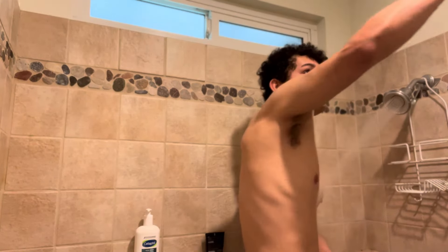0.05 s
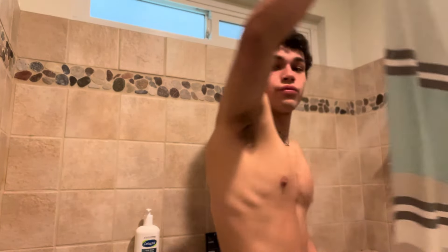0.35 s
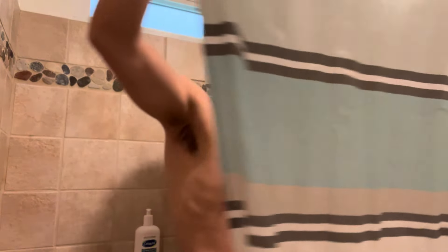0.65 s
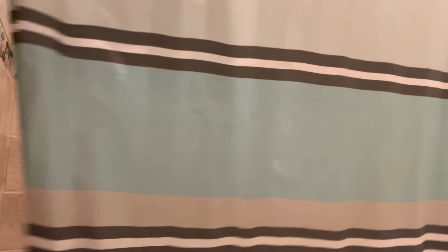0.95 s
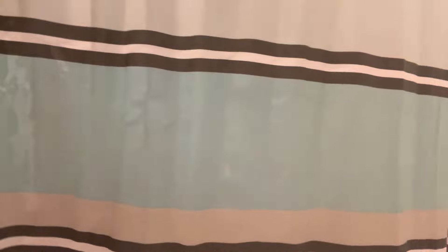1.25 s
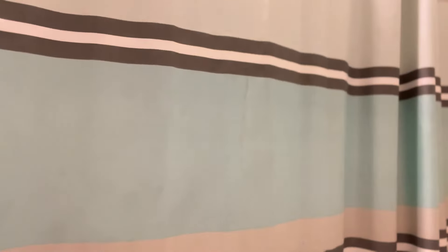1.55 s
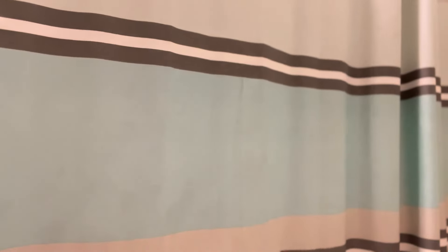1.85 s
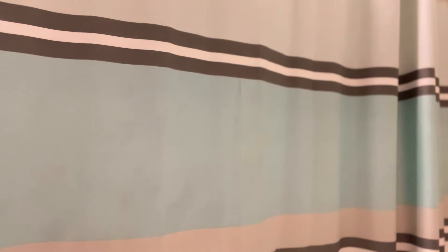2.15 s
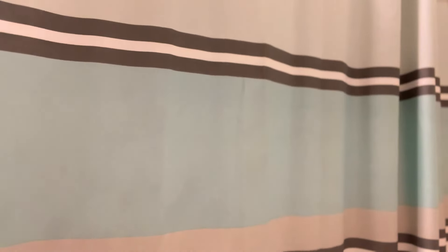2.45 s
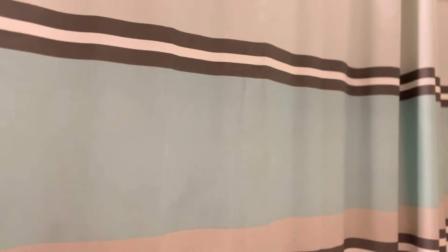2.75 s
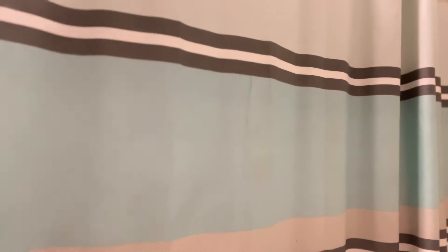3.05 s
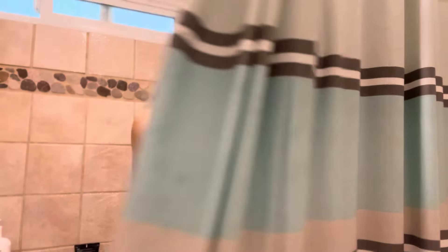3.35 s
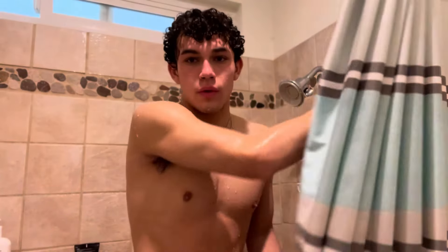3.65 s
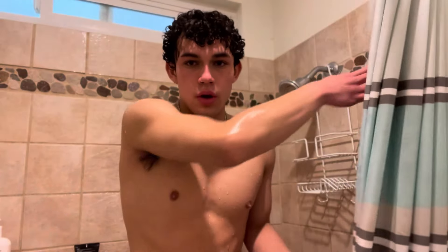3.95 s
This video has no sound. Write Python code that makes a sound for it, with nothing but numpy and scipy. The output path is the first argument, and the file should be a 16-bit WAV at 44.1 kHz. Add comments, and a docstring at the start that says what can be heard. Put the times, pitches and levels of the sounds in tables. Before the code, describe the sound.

Running shower water cuts off; after a hollow thump, curtain rings scrape along a rod.

```python
"""A shower hisses and drums in a tub in a small tiled bathroom; the curtain is drawn shut and slaps home. The
water sound breaks off abruptly at 1.3 s. Faint rustles and ticks follow, then a heavy thump sets the hollow tub
booming. The curtain is pulled open in jerks, its metal rings scraping along the rod and jingling as they
collide. Cloth and feet rumble and swish, over quiet room noise and a low hum."""
import sys
import numpy as np
from scipy import signal
from scipy.fft import rfft, irfft, next_fast_len
from scipy.io import wavfile
from scipy.ndimage import uniform_filter1d, map_coordinates

SR = 44100
rng = np.random.default_rng(int(sys.argv[2]) if len(sys.argv) > 2 else 0)


def output_pcm(signal):
    """Save a mono or channel-first signal as 16-bit PCM at the path in sys.argv[1].

    Samples are clipped to [-1, 1] before scaling.
    """
    pcm = np.clip(np.atleast_2d(signal).T, -1, 1) * 32767
    wavfile.write(sys.argv[1], SR, np.round(pcm).astype(np.int16))


N = 176400
SCENE_S = np.arange(N) / SR
EVENT_N = SR // 2
EVENT_S = np.arange(EVENT_N) / SR


def amp(db):
    """Decibels to gain."""
    return 10 ** (np.asarray(db) / 20)


def unit(x):
    """Scale to rms 1."""
    return x / np.sqrt(np.mean(x ** 2) + 1e-20)


def along(points, hz):
    """Interpolate (Hz, value) points on a log axis."""
    knots_hz, values = np.transpose(points)
    return np.interp(np.log(hz + 1), np.log(knots_hz + 1), values)


def curves(rows):
    """One value per sample for each column after the time."""
    times_s, *columns = np.transpose(rows)
    return [np.interp(SCENE_S, times_s, column) for column in columns]


def noise(size):
    """Two independent white noises."""
    return rng.standard_normal((2, size))


def wobble(knots_per_s):
    """Smooth random curve."""
    knots = rng.standard_normal(int(N * knots_per_s / SR) + 4)
    return map_coordinates(knots, [SCENE_S * knots_per_s])


def filtered(x, response):
    """Apply response(hz) to the spectrum of x."""
    n = x.shape[-1]
    padded = next_fast_len(n + SR // 8, True)
    return irfft(rfft(x, padded) * response(np.fft.rfftfreq(padded, 1 / SR)), padded)[..., :n]


def stereo(pair, spectrum=((1000, 0),)):
    """Two independent signals to a coloured left and right, room-wide, mid at rms 1."""
    # Room width. Each row: frequency in Hz, side over mid in dB.
    width = [(60, -14), (150, -11.5), (250, -8), (400, -4), (600, 3), (2400, -1), (4400, 2), (6500, -2.5),
             (8200, -9), (11000, -3.5), (15000, -3.5)]
    spread = lambda hz: np.array([np.ones_like(hz), amp(along(width, hz))])
    mid, side = filtered(pair, lambda hz: amp(along(spectrum, hz)) * spread(hz))
    return np.array([mid + side, mid - side]) / np.std(mid)


def patter(per_s, scatter_db=0, size=EVENT_N):
    """Two random trains of tiny impacts."""
    hit = rng.random((2, size)) < per_s / SR
    return hit * np.sign(noise(size)) * amp(scatter_db * noise(size))


def patchy(x, depth_db):
    """Brief random patches of brighter and duller pitch, as when drops land on different spots."""
    bins = signal.stft(x, nperseg=1024)[2]
    field = uniform_filter1d(rng.standard_normal(bins.shape[1:]), size=5, axis=0)
    field = unit(uniform_filter1d(field, size=4, axis=1))
    return unit(signal.istft(bins * amp(depth_db * field), nperseg=1024)[1][:, :x.shape[1]])


def uneven(x, depth_db, spacing_hz):
    """Give a contact its own random spectral peaks and dips."""
    knots = rng.standard_normal(1024)
    ripple = lambda hz: map_coordinates(knots, [hz / spacing_hz], mode='nearest')
    return unit(filtered(x, lambda hz: amp(depth_db * ripple(hz))))


def stroke(rise_s, hold_s, t60_s):
    """Envelope: linear rise, hold, exponential release."""
    return np.minimum(EVENT_S / rise_s, 1) * amp(-60 * np.maximum(EVENT_S - rise_s - hold_s, 0) / t60_s)


def in_room(x, wet_db):
    """Add the ring of the tiled walls to a short sound, at about the same energy."""
    # Wall reverberation. Each row: frequency in Hz, t60 in seconds.
    tiles = [(120, 0.77), (500, 0.18), (3000, 0.37), (8000, 0.37), (15000, 0.23)]
    hz, time_s, bins = signal.stft(stereo(noise(EVENT_N)), SR, nperseg=256)
    decay = amp(-60 * time_s / along(tiles, hz)[:, None]) * (time_s > .004)
    response = signal.istft(bins * decay, SR, nperseg=256)[1][:, :EVENT_N]
    response *= amp(wet_db) / np.linalg.norm(response.mean(0))
    response[:, 0] += 1  # direct path
    return signal.fftconvolve(np.atleast_2d(x), response, axes=1) / np.hypot(1, amp(wet_db))


def add(out, start_s, x):
    """Mix x into out from start_s."""
    part = out[:, max(round(start_s * SR), 0):][:, :x.shape[1]]
    part += x[:, :part.shape[1]]


def shower(off_s=1.305, cut_s=0.0044):
    """Fine spray hisses, drops splash on tiles and drum on the tub, until the whole sound breaks off at once."""
    # Running water. Each row: time in seconds, then spray, splash and drumming levels in dB.
    water = [(0, -29, -35, -36.5), (.3, -27, -35.5, -34.5), (.55, -28, -36.5, -31.5),
             (.78, -31, -34.5, -30.5), (.97, -30, -41, -39), (1.3, -32, -42, -46)]
    # Spectra of the three. Each row: frequency in Hz, level in dB.
    spray_spectrum = [(2500, -37.5), (5000, -17), (6700, -4.5), (7700, 1.5), (8200, -2), (8800, 6),
                      (9500, -4), (9900, -9), (11500, -11), (12600, -4.5), (13500, -12.5), (15500, -21.5)]
    splash_spectrum = [(200, -3), (500, -1.5), (900, 1), (1400, -1), (2200, 6), (3000, 1.5), (5000, 0.5),
                       (8000, -1), (15000, -38)]
    drum_spectrum = [(25, -44), (50, -23), (90, -20), (130, -4.5), (190, -1.5), (260, -2), (310, -15),
                     (390, -8), (550, -18), (900, -61.5), (2000, -56)]
    spray_db, splash_db, drum_db = curves(water)
    drops = lambda: unit(patter(per_s=3500, scatter_db=1.5, size=N)) + 0.56 * noise(N)
    spray = amp(spray_db + 0.65 * wobble(69.5)) * stereo(patchy(drops(), depth_db=4), spray_spectrum)
    splash = amp(splash_db + 1.7 * wobble(30.45)) * stereo(patchy(drops(), depth_db=2.5), splash_spectrum)
    drum = amp(drum_db + 1.1 * wobble(14.1)) * stereo(drops(), drum_spectrum)
    flow = np.clip(1 - (SCENE_S - off_s) / cut_s, 0, 1)
    return (spray + splash + drum) * flow


def background(hum_hz=88.3, hum_db=-48.5, floor_db=-53.5):
    """Quiet room noise with a wavering low hum."""
    # Room noise. Each row: frequency in Hz, level in dB.
    floor_spectrum = [(18, -62), (30, -3), (92, -13.5), (125, -27), (253, -38), (355, -42), (437, -45),
                      (2030, -43), (15000, -57)]
    hum_gain = amp(hum_db + 2 * wobble(3.97))
    hum = hum_gain * np.sin(2 * np.pi * hum_hz * SCENE_S + 1.4 * wobble(5.8))
    return hum + amp(floor_db) * stereo(noise(N), floor_spectrum)


def movement():
    """Cloth and a body moving in the tub: low rumble and soft, uneven swish."""
    # Motion. Each row: time in seconds, rumble level in dB, swish level in dB.
    levels = [(1.3, -39.5, -41), (1.55, -41.5, -57.5), (1.7, -44, -52), (1.92, -53, -69),
              (2.06, -36.5, -54), (2.27, -41.5, -47.5), (2.5, -44.5, -49.5), (2.68, -22.5, -38.5),
              (2.85, -38, -34), (3.05, -36.5, -32.5), (3.3, -30, -29), (3.6, -36, -32), (3.82, -31.5, -31),
              (3.92, -43, -32), (4, -38, -39)]
    # Spectra of the two. Each row: frequency in Hz, level in dB.
    rumble_spectrum = [(25, -25.5), (50, -0.5), (90, 6), (160, 1), (250, -3.5), (400, -13), (650, -15),
                       (1200, -27), (3000, -48)]
    swish_spectrum = [(400, 14), (1000, -6.5), (2500, -2.5), (5000, -8), (8800, -0.5), (10200, -6.5),
                      (12500, -4.5), (15500, -5)]
    rumble_db, swish_db = curves(levels)
    rumble = amp(rumble_db + wobble(12)) * stereo(patchy(noise(N), depth_db=3), rumble_spectrum)
    swish_gain = amp(swish_db + 2.6 * wobble(30))
    grains = patchy(patter(per_s=9000, scatter_db=3.5, size=N), depth_db=4.5)
    return rumble + swish_gain * stereo(grains, swish_spectrum)


def rustles():
    """The wet curtain slaps and crinkles in short bursts."""
    # Slaps and rustles. Each row: start, rise and hold in seconds, level in dB.
    bursts = [(.01, 0.0053, 0.021, -28.5), (0.242, 0.0078, 0.019, -32), (0.348, 0.0052, .02, -35),
              (0.489, 0.0042, 0.012, -33.5), (0.677, .004, 0.023, -27), (1.034, 0.0015, 0.0055, -26),
              (1.055, 0.0027, 0.011, -24.5), (1.207, 0.0051, 0.013, -38), (1.317, 0.022, 0.061, -46),
              (1.505, 0.0044, .02, -47), (1.621, .005, 0.0077, -49.5), (1.674, 0.0062, 0.014, -46),
              (2.023, 0.0089, 0.023, -38.5), (2.116, 0.0078, 0.012, -51), (2.364, 0.0085, 0.063, -45.5),
              (2.529, 0.0058, 0.042, -43), (2.815, 0.0082, 0.024, -43.5), (3.947, 0.0034, .03, -37)]
    # Curtain cloth. Each row: frequency in Hz, level in dB.
    cloth_spectrum = [(150, -8), (400, 2.5), (700, -2), (1050, -3), (1500, -1.5), (2100, -2), (3200, -1),
                      (5000, -3.5), (9000, -8), (15000, -14)]
    out = np.zeros((2, N))
    for start_s, rise_s, hold_s, db in bursts:
        grains = uneven(patter(per_s=3000), depth_db=1, spacing_hz=148)
        crinkle = stereo(grains, cloth_spectrum) * stroke(rise_s, hold_s, t60_s=0.19)
        add(out, start_s, amp(db) * in_room(crinkle, wet_db=-10))
    return out


def ticks():
    """Light knocks, drips and ticks, each a quickly dying band of noise."""
    # Contacts. Each row: start in seconds, level in dB, centre and half-width in Hz, t60 in seconds.
    contacts = [(0.251, -26, 50.5, 50, 0.2), (1.04, -14, 2000, 1150, 0.088), (1.064, -22.5, 151, 116, 0.14),
                (1.069, -22.5, 1730, 1200, 0.064), (.688, -21, 7860, 2500, 0.039),
                (1.036, -14, 7750, 900, 0.049), (1.035, -14.5, 13000, 4000, .035),
                (1.525, -41.5, 556, 300, 0.097), (1.635, -42, 430, 295, 0.12),
                (1.824, -46, 150, 119, 0.099), (2.06, -44, 720, 200, .1), (1.952, -44.5, 1190, 690, 0.16),
                (2.14, -43, 6500, 3500, 0.1), (2.213, -46.5, 11500, 5000, .15),
                (2.353, -36, 14400, 3000, 0.13), (2.43, -38, 13700, 4000, .15),
                (2.3, -38, 2640, 200, 0.058), (2.312, -26, 2730, 280, 0.074),
                (2.357, -26, 7270, 710, 0.076), (2.357, -35.5, 8760, 1000, 0.34),
                (2.439, -31.5, 8950, 1500, 0.091), (2.445, -44, 1210, 200, 0.16)]
    out = np.zeros((2, N))
    for start_s, db, centre_hz, half_width_hz, t60_s in contacts:
        resonance = lambda hz: hz * half_width_hz / (hz * half_width_hz + 0.5j * (hz**2 - centre_hz**2))
        band = filtered(stereo(noise(EVENT_N)), lambda hz: resonance(hz) ** 2)
        tick = unit(band) * stroke(rise_s=0.0013, hold_s=0.0032, t60_s=t60_s)
        add(out, start_s, amp(db) * in_room(tick, wet_db=-5.5))
    return out


def thumps(thud_db=-8.5, scuff_db=-12, scuff_lead_s=0.0056, sag_hz=22.3, sag_s=0.023):
    """A scuff, then weight lands on the hollow tub with a dull thud and sets it booming."""
    # Landings. Each row: start in seconds, level in dB.
    landings = [(2.591, -10), (2.703, -34.5)]
    # Tub modes. Each row: frequency in Hz, level in dB, t60 in seconds.
    tub_modes = [(136.2, -1, 0.34), (151.2, 0.5, 0.18), (215, -10.5, 0.092), (321, -6.5, .08),
                 (360.5, -1.5, 0.074), (425.6, -20.5, 0.14), (492, -11, 0.11), (610, -30, 0.11),
                 (820, -20.5, 0.051), (1053, -20, 0.041), (1330, -24, 0.045), (1635, -19, 0.091),
                 (2230, -27, .07), (2800, -26, 0.066)]
    # Contact spectra. Each row: frequency in Hz, level in dB.
    thud_spectrum = [(60, -25), (105, 3), (145, -3), (250, -5), (350, -3), (450, -10), (620, -17),
                     (800, -36), (1700, -32), (2100, -29), (5000, -40)]
    scuff_spectrum = [(200, -2.5), (500, 2), (900, -4.5), (1250, -7.5), (1650, 0), (2000, -9.5),
                      (2350, -9.5), (3200, -16.5), (6000, -19), (15000, -33)]
    out = np.zeros((2, N))
    sag_cycles = sag_hz * sag_s * (1 - np.exp(-EVENT_S / sag_s))  # modes start sharp and settle
    for start_s, db in landings:
        boom = np.zeros(EVENT_N)
        for hz, mode_db, t60_s in tub_modes:
            tone = np.sin(2 * np.pi * (hz * EVENT_S + sag_cycles + rng.random()))
            boom += amp(mode_db) * tone * stroke(rise_s=0.014, hold_s=0.011, t60_s=t60_s)
        thud = stereo(noise(EVENT_N), thud_spectrum) * stroke(rise_s=0.011, hold_s=0.022, t60_s=0.23)
        add(out, start_s, amp(db) * in_room(boom + amp(thud_db) * thud, wet_db=-9))
        scuff = stereo(patter(per_s=2400, scatter_db=2), scuff_spectrum)
        scuff *= stroke(rise_s=0.0052, hold_s=0.0098, t60_s=0.17)
        add(out, start_s - scuff_lead_s, amp(db + scuff_db) * in_room(scuff, wet_db=-12.5))
    return out


def one_ring(push, detune=0.006, mode_scatter_db=4.3):
    """One metal ring, tuned a little unlike the others, struck at random while pushed."""
    # Ring modes. Each row: frequency in Hz, relative energy in dB, t60 in seconds.
    ring_modes = [(3090, -13.5, .15), (7050, -1, 0.068), (7140, 3, 0.055), (8250, -8, 0.13),
                  (8370, -13, 0.11), (8750, -24, .12), (12050, 7.5, 0.11), (11920, 3.5, 0.23),
                  (12500, -2, 0.1), (12730, -13, .12), (13260, -3, 0.11), (14500, -7, 0.17),
                  (14700, -22, .06)]
    ping = np.zeros(EVENT_N)
    for hz, db, t60_s in ring_modes:
        envelope = amp(db + mode_scatter_db * rng.standard_normal() - 60 * EVENT_S / t60_s)
        tuned_hz = hz * (1 + detune * rng.standard_normal())
        ping += envelope / np.sqrt(t60_s) * np.sin(2 * np.pi * tuned_hz * EVENT_S)
    clicks = stereo(patter(per_s=220, scatter_db=5.5)) * push
    return signal.fftconvolve(clicks, ping[None] / np.linalg.norm(ping), axes=1)[:, :EVENT_N]


def curtain_rings(count=3, rise_s=0.0023, t60_s=0.17, smack_db=-2.5, ringing_db=-2.5, clatter_db=-1):
    """At each jerk a few rings smack together, then scrape on the rod and go on clicking."""
    # Jerks along the rod. Each row: start and hold in seconds, jingle and scrape levels in dB.
    jerks = [(2.896, 0.011, -12, -23.5), (2.922, 0.023, -20, -26), (2.999, 0.017, -16, -21),
             (3.027, 0.013, -18, -18), (3.066, 0.019, -16, -23), (3.104, 0.026, -14.5, -21.5),
             (3.139, 0.024, -19, -18.5), (3.214, 0.043, -16, -20.5), (3.329, 0.013, -14, -19),
             (3.352, 0.05, -19.5, -24), (3.467, 0.011, -12.5, -23.5), (3.487, 0.004, -23, -17.5),
             (3.519, 0.034, -23, -31), (3.626, 0.019, -16, -23), (3.73, 0.013, -13.5, -24),
             (3.758, 0.023, -18.5, -25)]
    # Spectra of ring on ring and ring on rod. Each row: frequency in Hz, level in dB.
    clatter_spectrum = [(3000, -19), (5500, -10.5), (7000, -10.5), (9400, 0), (9850, -10), (11500, -6),
                        (12200, 2.5), (13600, -0.5), (15500, -2.5)]
    rod_spectrum = [(150, -28), (450, -8.5), (800, -10.5), (1350, -1.5), (1900, -9), (2400, 1.5),
                    (3500, -0.5), (5000, -3.5), (6500, -2.5), (9000, -2), (15000, -25)]
    out = np.zeros((2, N))
    smack = amp(smack_db) * stroke(rise_s, hold_s=0.003, t60_s=0.03)
    for start_s, hold_s, jingle_db, scrape_db in jerks:
        push = stroke(rise_s, hold_s, t60_s) + smack
        ringing = sum(one_ring(push) for _ in range(count)) / np.sqrt(count)
        clicks = uneven(patter(per_s=1500), depth_db=5.5, spacing_hz=200.8)
        clatter = stereo(clicks, clatter_spectrum) * push
        jingle = amp(ringing_db) * ringing + amp(clatter_db) * clatter
        friction = uneven(patter(per_s=3000, scatter_db=3.5), depth_db=4, spacing_hz=110.6)
        scrape = stereo(patchy(friction, depth_db=3), rod_spectrum) * stroke(0.003, hold_s, t60_s)
        add(out, start_s, in_room(amp(jingle_db) * jingle + amp(scrape_db) * scrape, wet_db=-5))
    return out


def scene():
    """Everything in the bathroom."""
    return shower() + background() + movement() + rustles() + ticks() + thumps() + curtain_rings()


def record(dry, low_cut_hz=44, top_hz=15600):
    """Lean the bass left, cut the lows, clip at full scale, then low-pass steeply."""
    left_over_right_db = [(200, 2.9), (500, 0.27), (8000, .2)]  # by frequency in Hz
    lean = lambda hz: amp(along(left_over_right_db, hz) * np.array([[.5], [-.5]]))
    shaped = filtered(dry, lambda hz: lean(hz) * hz ** 3 / (hz ** 3 + low_cut_hz ** 3))
    return filtered(np.clip(shaped, -1, 1), lambda hz: 1 / (1 + (hz / top_hz) ** 200))


dry = scene()
out = record(dry)
output_pcm(out)
```